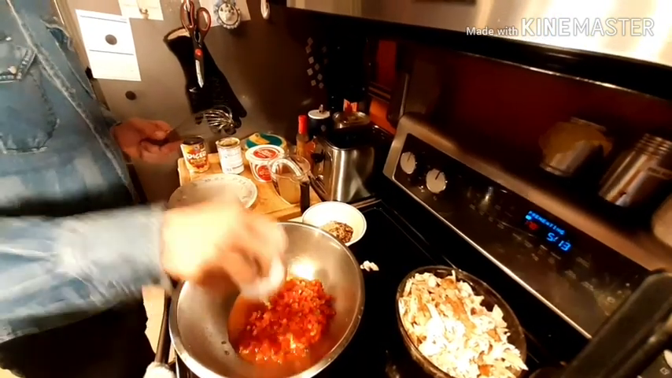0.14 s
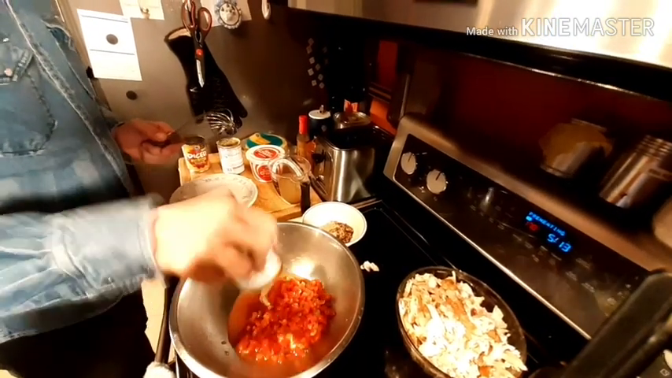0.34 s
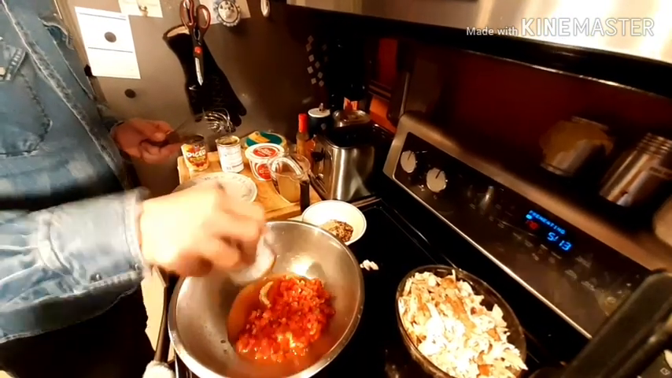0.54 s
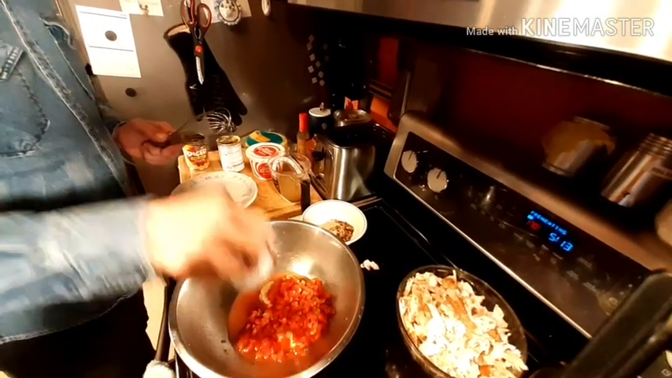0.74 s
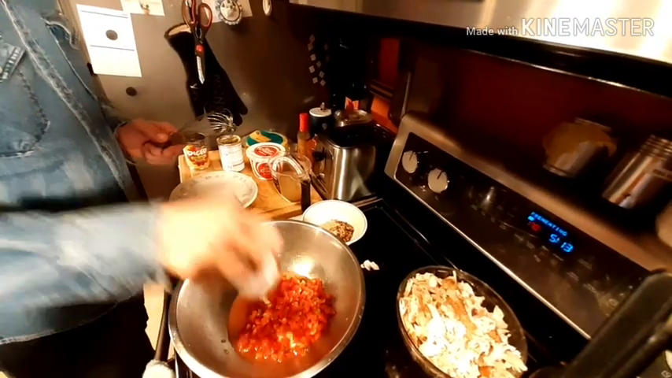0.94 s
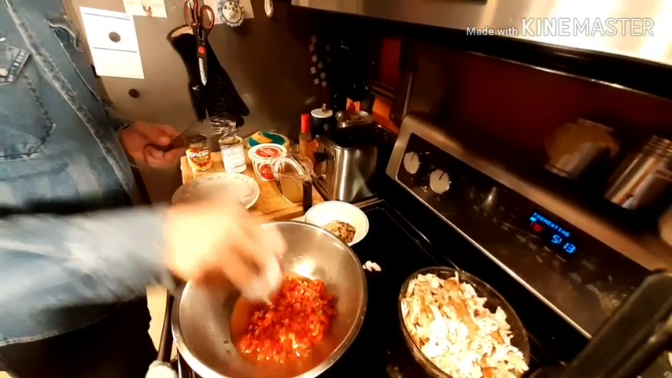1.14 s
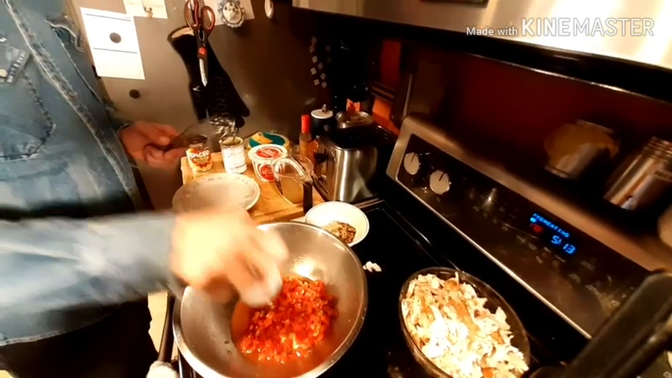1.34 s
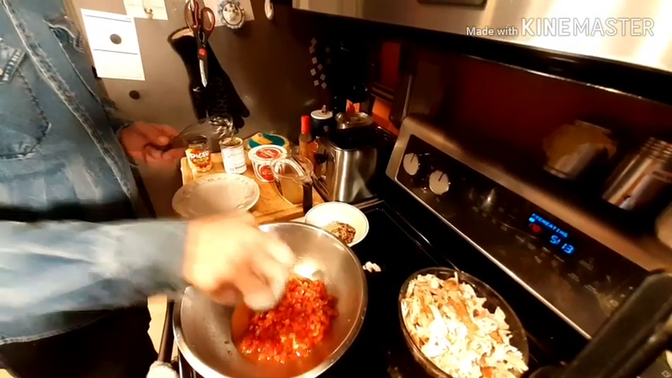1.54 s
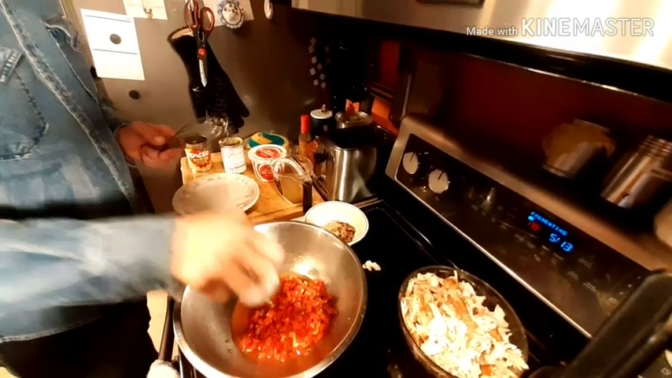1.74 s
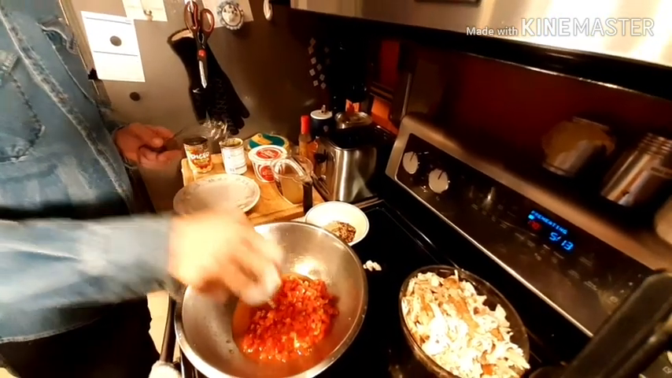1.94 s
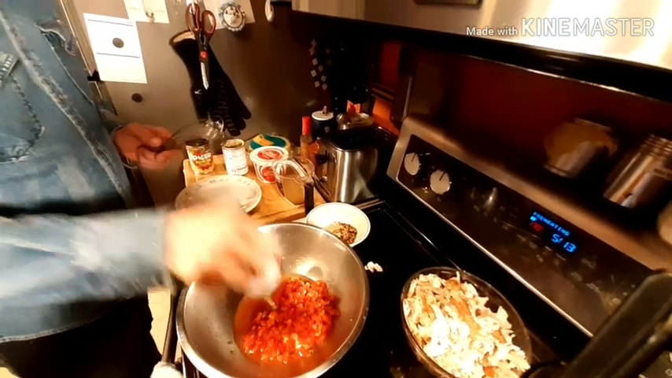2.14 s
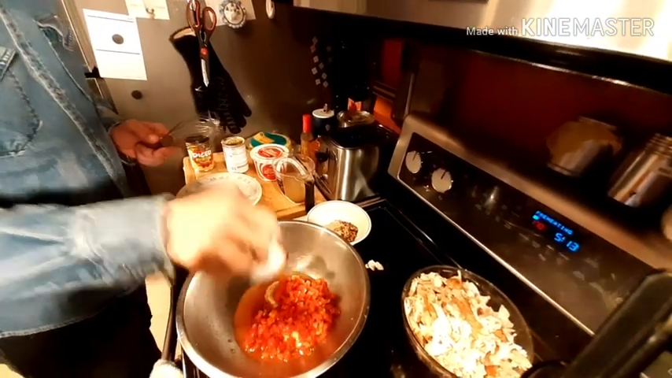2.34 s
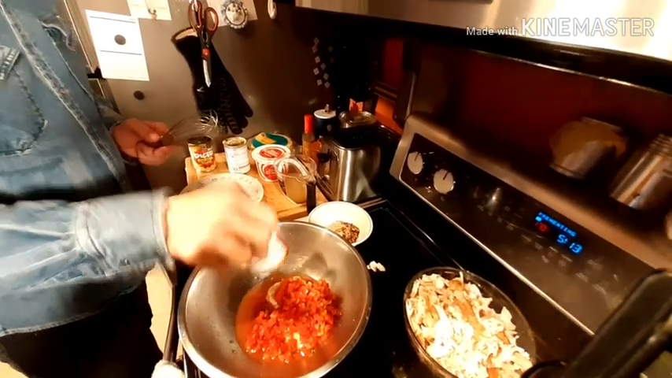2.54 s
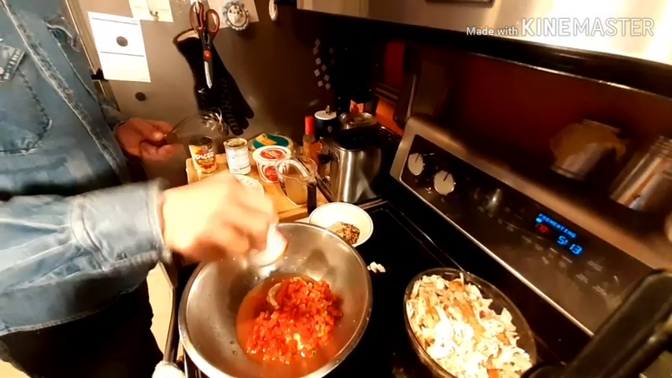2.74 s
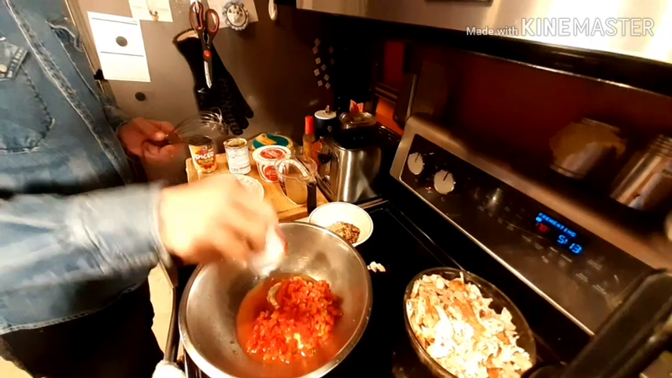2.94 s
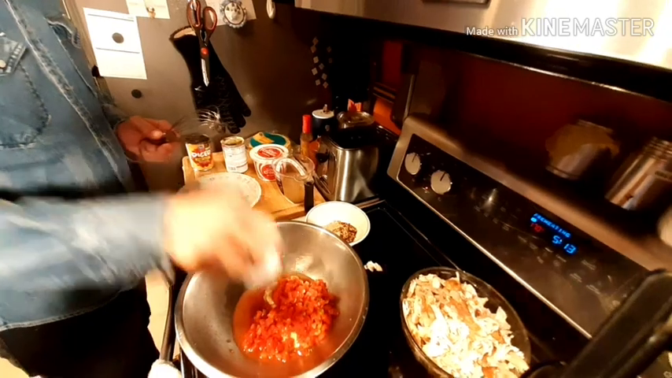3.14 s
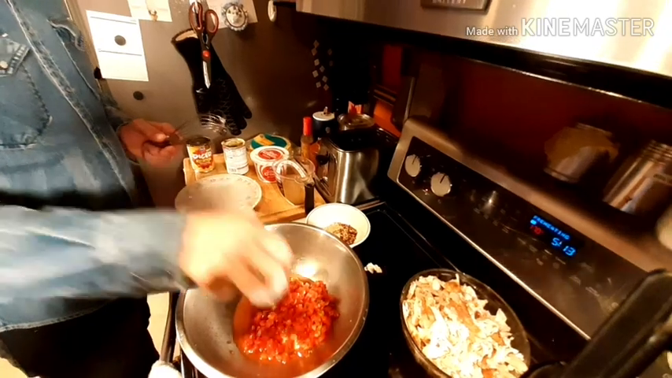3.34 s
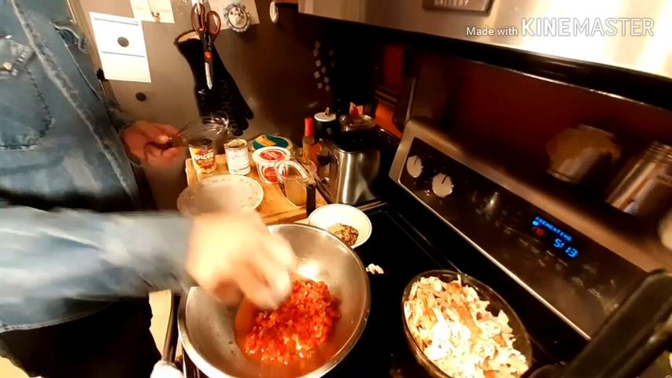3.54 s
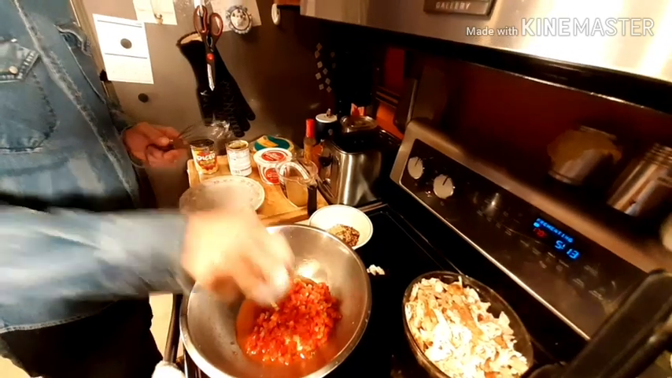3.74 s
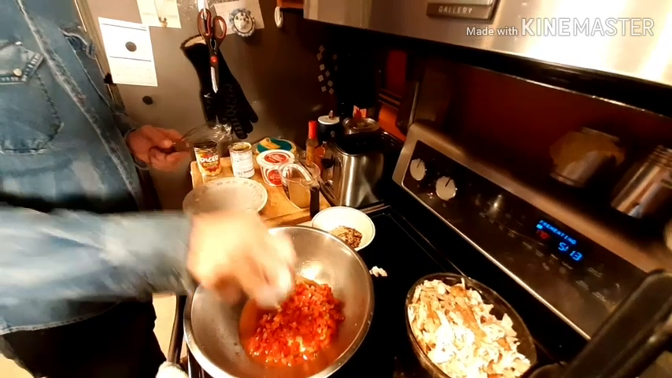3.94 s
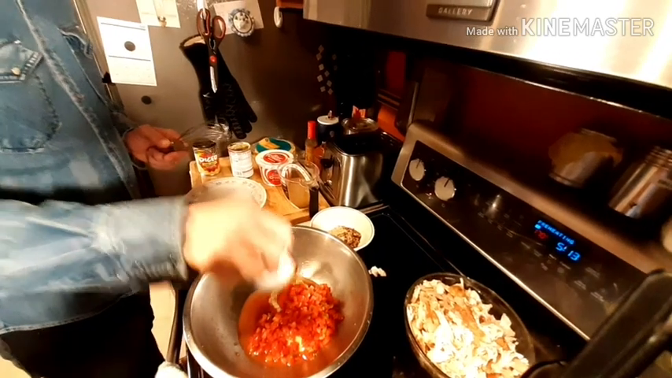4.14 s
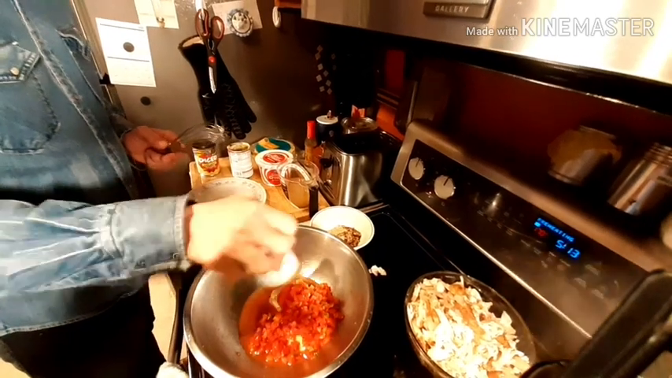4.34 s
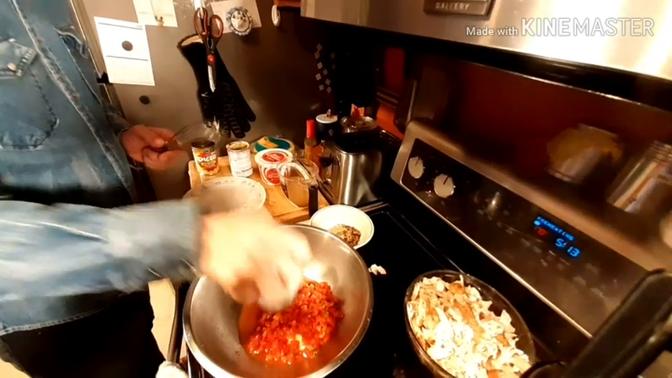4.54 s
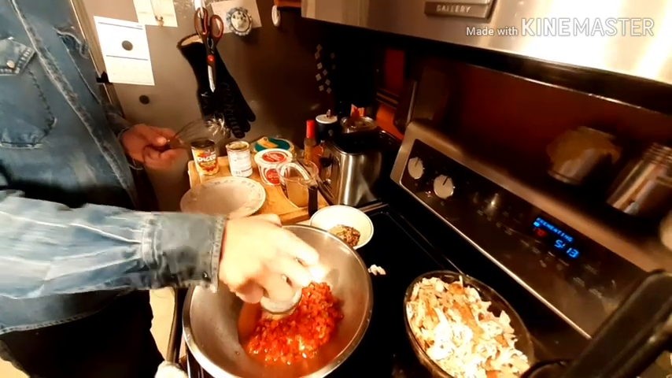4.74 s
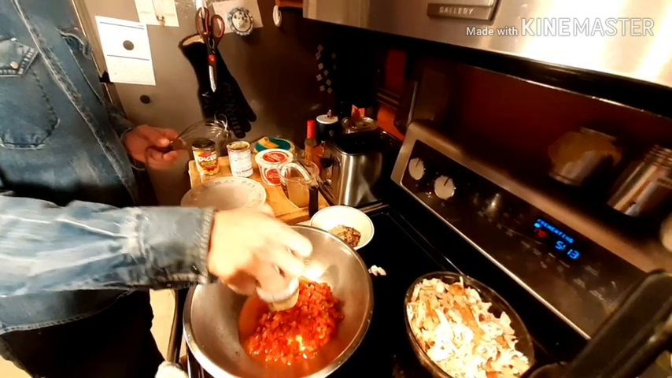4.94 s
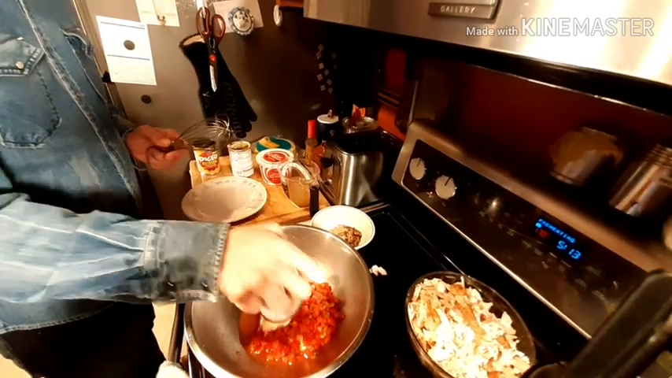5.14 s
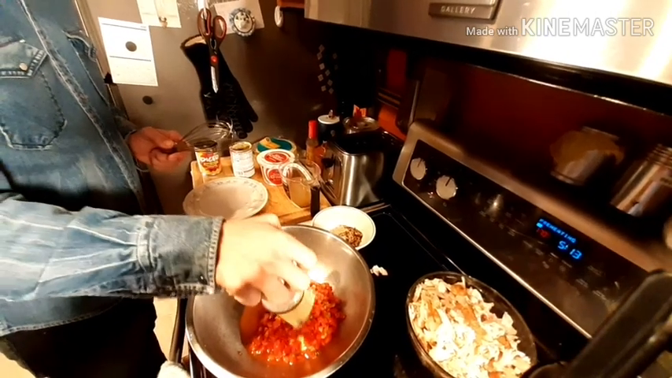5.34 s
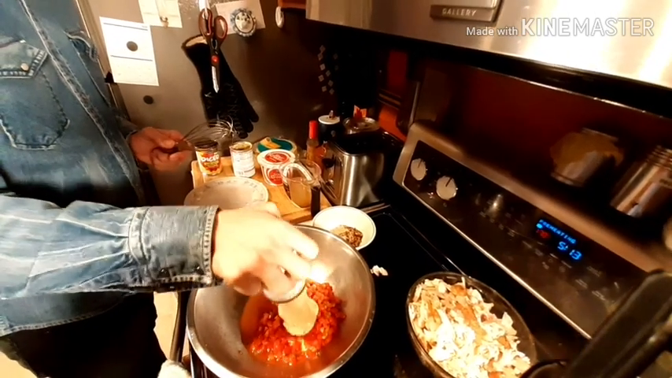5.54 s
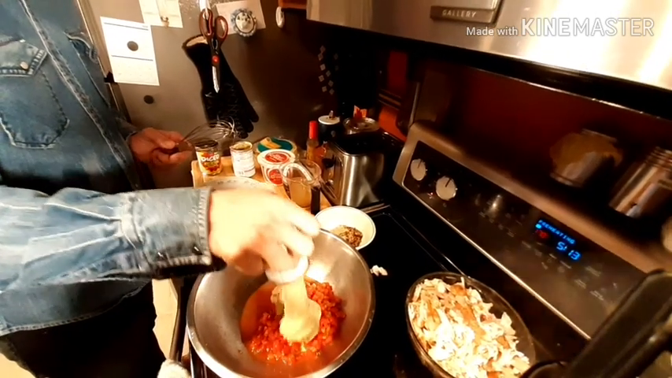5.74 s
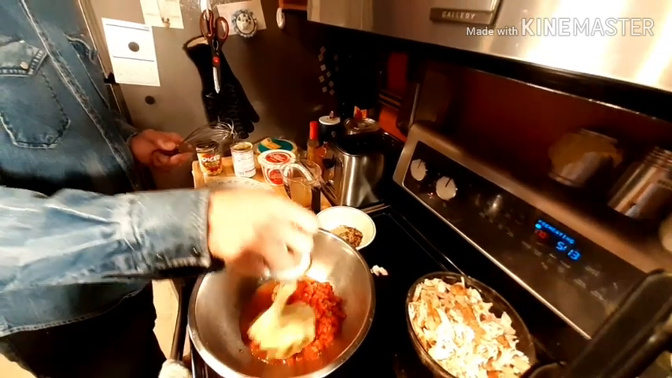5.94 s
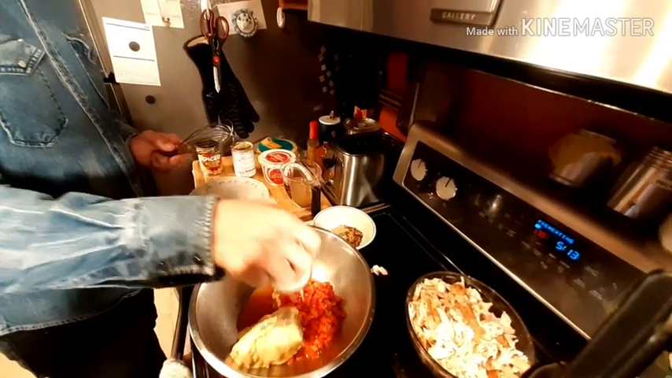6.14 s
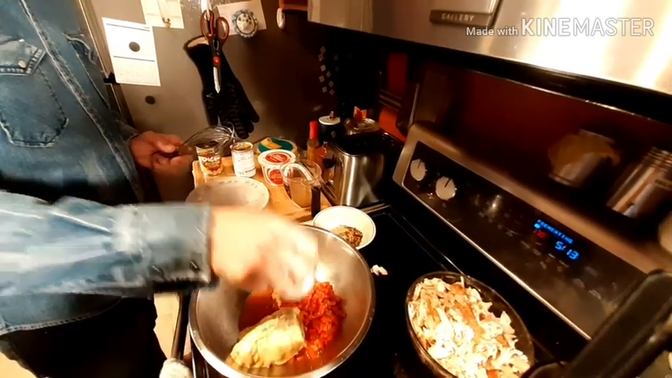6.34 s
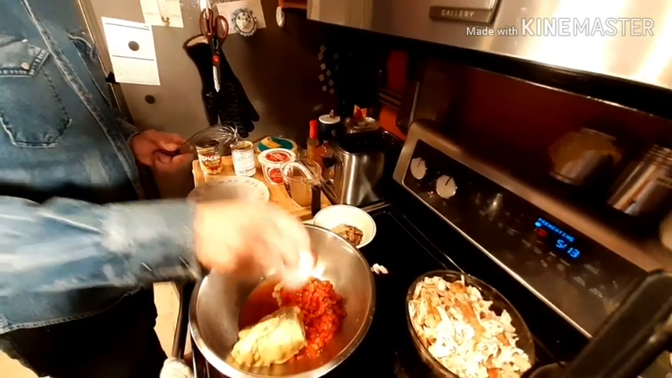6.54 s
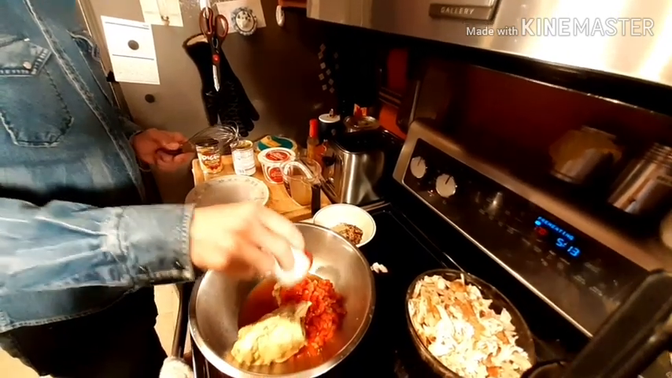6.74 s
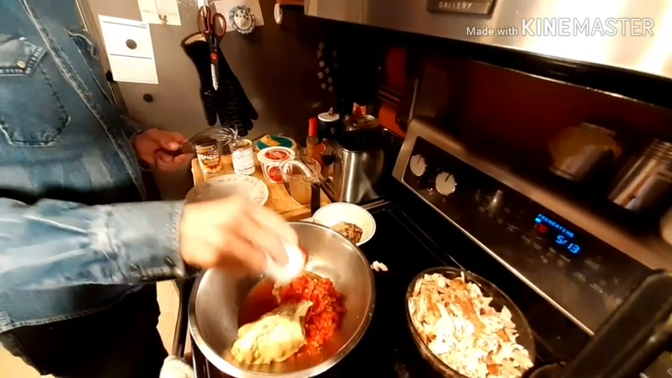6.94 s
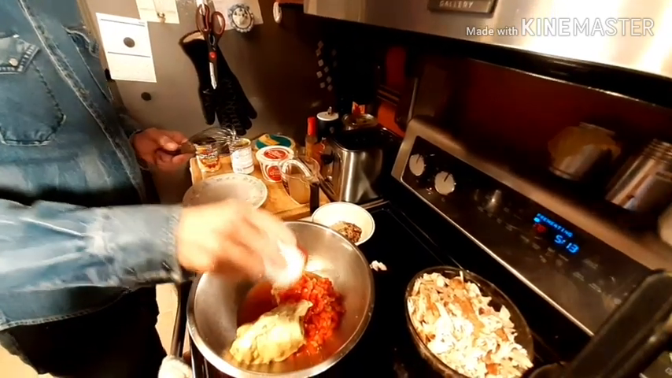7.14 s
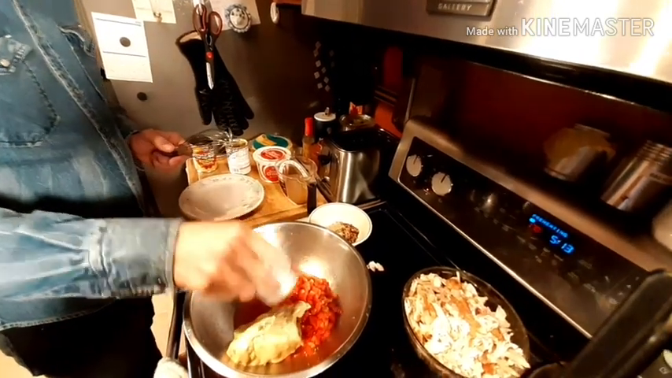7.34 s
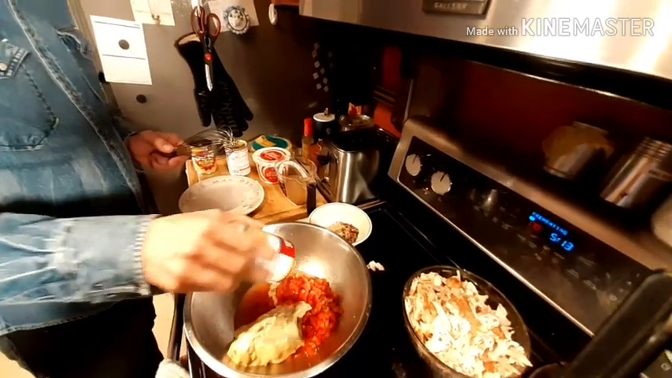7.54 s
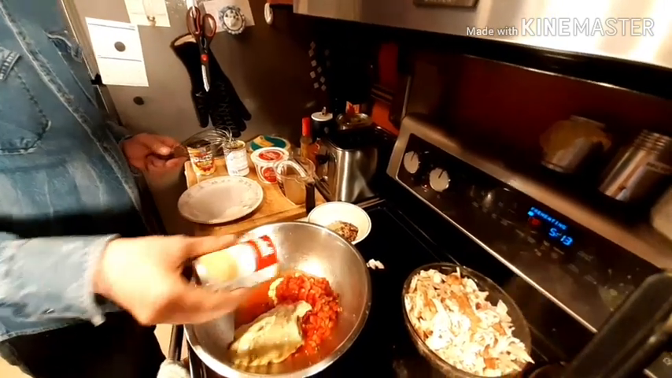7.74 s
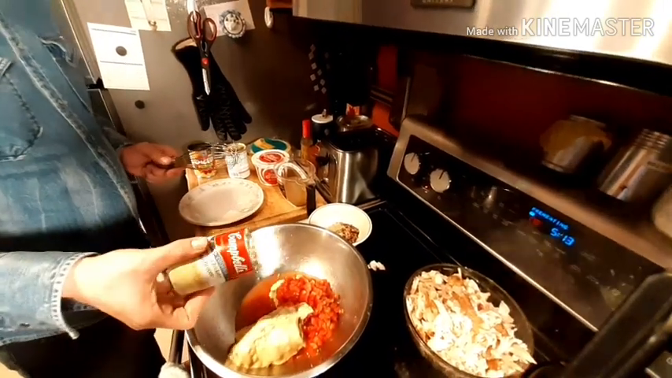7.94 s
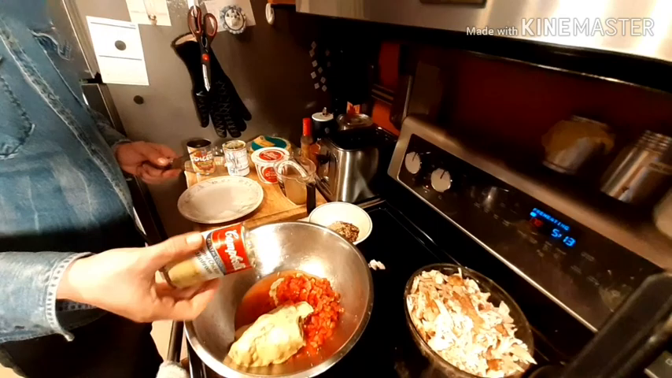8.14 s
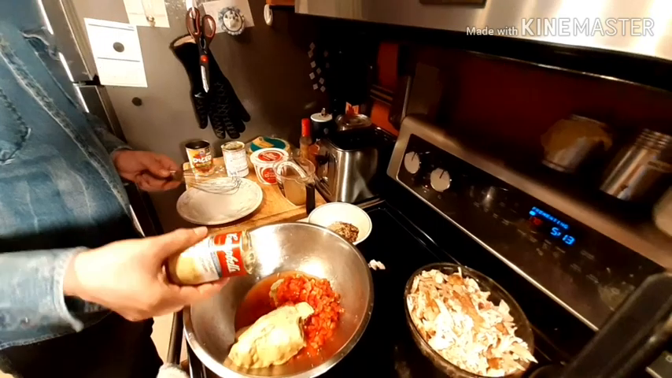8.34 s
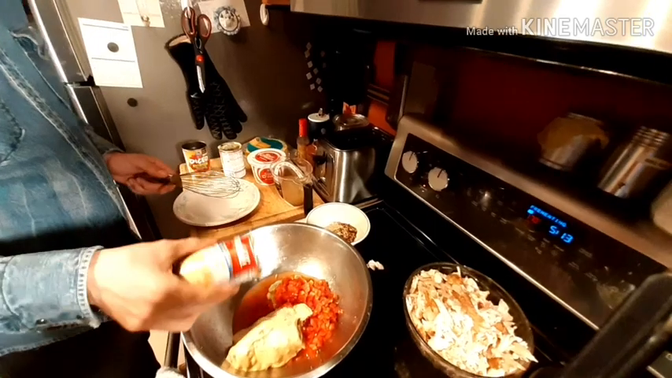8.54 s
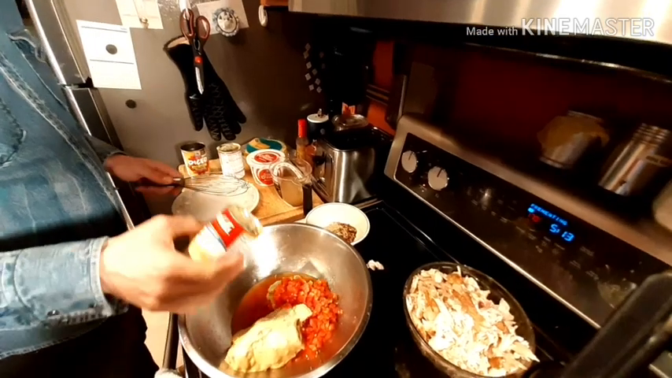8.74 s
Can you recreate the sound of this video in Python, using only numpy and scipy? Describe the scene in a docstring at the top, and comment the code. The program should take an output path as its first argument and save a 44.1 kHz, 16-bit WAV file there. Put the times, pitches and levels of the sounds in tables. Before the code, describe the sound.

Over steady hiss and motor hum, thick soup squelches and glugs in a shaken can, then plops heavily into a steel bowl.

```python
"""Steady hiss and a low motor hum come first; then wet squelches and glugs, as a can of thick soup is
shaken upside down over a steel bowl. The plug drops with a plop and a splat, and a last dollop follows.
Squelches are filtered bursts of clicks, glugs short sine tones, thuds pushes on ringing modes.
A sleeve's rustle, the hiss and the rumble are shaped noise; the hum, a sine tone, stops partway.
The can and bowl sounds also echo in a small kitchen."""
import sys
import numpy as np
from scipy import signal
from scipy.fft import rfft, irfft
from scipy.io import wavfile
from scipy.ndimage import uniform_filter1d

SR = 44100
rng = np.random.default_rng(int(sys.argv[2]) if len(sys.argv) > 2 else 0)


def wrap_up_sound(samples):
    """Save the sound to the file named by the first command line argument, as 16-bit audio."""
    columns = np.atleast_2d(samples).T
    # keep every value between -1 and 1, then stretch to whole-number steps
    tamed = np.clip(columns, -1, 1)
    steps = np.round(tamed * 32767).astype(np.int16)
    wavfile.write(sys.argv[1], SR, steps)


N = 390726  # samples in the whole scene

# Air crackling past the soup:
# start_s, length_s, cavity_pitch_hz, cavity_level_db, lip_level_db, spray_level_db
AIR_TEARS = [(0.9773, 0.0025, 2040, -23.5, -25, -25.5), (1.108, .0044, 1780, -30.5, -52, -44),
             (1.195, 0.0061, 2320, -18, -30.5, -24.5), (1.612, 0.0086, 1890, -31.5, -36, -39),
             (1.987, .015, 1900, -34.5, -37, -33), (2.173, .006, 1660, -39, -52, -45),
             (2.349, .0037, 1500, -41, -46, -34), (2.36, 0.0069, 1710, -37.5, -44, -40),
             (2.5542, .0043, 1700, -34, -41, -34), (2.654, .005, 1820, -39.5, -55, -48),
             (2.76, .0056, 1500, -42, -47, -42), (2.844, 0.0046, 2100, -34, -55, -47),
             (2.952, .008, 1890, -37, -42, -50), (2.9652, .006, 1700, -31.5, -31, -31),
             (3.18, .005, 1400, -35.5, -52, -38), (3.428, 0.0047, 1810, -30.5, -33, -29.5),
             (3.5875, 0.018, 1780, -37, -45, -35.5), (3.7914, .0083, 2030, -36.5, -42, -39.5),
             (3.987, .008, 2030, -42, -46, -38.5), (4.152, 0.0087, 1580, -47, -51, -33.5),
             (4.57, .0061, 2400, -40, -37.5, -34), (4.577, 0.0096, 2780, -28, -46, -34.5),
             (4.602, 0.0099, 1630, -32, -51, -39.5), (5.058, .008, 1780, -35, -57, -52),
             (5.111, 0.012, 2070, -40, -46, -35), (5.124, 0.015, 1200, -39, -49, -32.5),
             (6.0174, 0.008, 2180, -45, -49, -35)]
# Tone of the wet spray: pitch_hz, relative_level_db (per Hz)
SPRAY_TONE = [(1500, -12), (4000, -13), (4850, 4.5), (5800, 0), (7600, 3), (8300, 4), (9300, 1),
              (12000, 1.5), (15500, -6)]
CAVITY_WIDTH_HZ, USUAL_CAVITY_HZ = 1160, 1785
LIP_HZ, LIP_WIDTH_HZ = 3500, 1300  # the narrow lip of the gap
# The throat is set against the cavity level; the lower the cavity's pitch, the louder the throat.
THROAT_HZ, THROAT_WIDTH_HZ = 843, 690
THROAT_DB, THROAT_DB_PER_OCTAVE = -11, -29.5


def squelches():
    """Each tear rings the air in the can and the narrow lip of the gap, and throws a wet fizz."""
    out = np.zeros((2, N))
    for start_s, length, cavity_hz, cavity_db, lip_db, spray_db in list(AIR_TEARS) + faint_squelches():
        octaves = np.log2(cavity_hz / USUAL_CAVITY_HZ)
        throat_db = cavity_db + THROAT_DB + THROAT_DB_PER_OCTAVE * octaves
        direct, scattered = burst(length, fall=0.0031 + 0.42 * length, grain_db=5)
        drive = direct + 0.71 * scattered  # the steel wall scatters differently to each port
        parts = [
            (band(drive, THROAT_HZ, THROAT_WIDTH_HZ), throat_db),
            (band(drive, cavity_hz, CAVITY_WIDTH_HZ), cavity_db),
            (resonate(drive, LIP_HZ, LIP_WIDTH_HZ), lip_db),
            (colour(0.5 * direct + scattered, SPRAY_TONE), spray_db),
        ]
        add(out, start_s, sum(at_level(part, db, length + 0.0019) for part, db in parts))
    return out


FIRST_FAINT_S, LAST_FAINT_S, FAINT_LENGTH_S = 0.5, 4.5, 0.012
FAINT_DB, FAINT_SPREAD_DB = -46, 10  # loudest level, and how much weaker a part may be


def faint_squelches(count=8):
    """Small tears at random moments while the can is shaken, up to a quarter octave off the usual pitch."""
    rows = []
    for when, pitch, *weaker in rng.random((count, 5)):
        start_s = FIRST_FAINT_S + (LAST_FAINT_S - FIRST_FAINT_S) * when
        cavity_hz = USUAL_CAVITY_HZ * 2 ** (0.5 * (pitch - 0.5))
        part_levels = FAINT_DB - FAINT_SPREAD_DB * np.array(weaker)
        rows.append((start_s, FAINT_LENGTH_S, cavity_hz, *part_levels))
    return rows


# The steel wall's ringing notes: pitch_hz, relative_level_db, time_to_fall_60_db_s
STEEL_NOTES = [(1960, 0, 0.18), (2150, -19, .13), (2310, -3, 0.072), (2704, 3, 0.16), (3430, 0, .08),
               (8300, -12, .06)]


def steel_wall(tears):
    """The steel wall sings along with each tear."""
    return excite(tears, STEEL_NOTES, coupling_db=-54.5)


# Air pockets gulped into the can: start_s, pitch_hz, level_db
AIR_POCKETS = [(2.173, 615, -47), (2.555, 608, -42.5), (2.688, 300, -50), (2.76, 630, -40.5),
               (2.966, 644, -41), (3.100, 566, -31.5), (3.181, 346, -35), (3.398, 300, -39),
               (3.400, 547, -35.5), (4.258, 650, -46), (4.43, 620, -47), (4.5801, 328, -17.5),
               (4.594, 326, -31), (4.712, 545, -30), (5.058, 597, -34.5), (5.1093, 284, -35),
               (5.125, 323, -27), (5.135, 523, -33.5), (6.019, 175, -46)]
GLUG_LENGTH_S, GLUG_USUAL_HZ, GLUG_LENGTH_POWER = 0.0098, 400, 0.4  # low pockets throb for longer
GLUG_OVERTONE_DB = -19.5  # second harmonic against the first


def glugs():
    """A pocket of air throbs for a few cycles, until the soup closes on it."""
    out, t = np.zeros((2, N)), np.arange(SR // 20) / SR
    for start_s, hz, db in AIR_POCKETS:
        turn = 2 * np.pi * hz * t
        length = GLUG_LENGTH_S * (GLUG_USUAL_HZ / hz) ** GLUG_LENGTH_POWER
        closing = np.exp(-np.maximum(t - 0.816 * length, 0) / 0.001)
        gate = np.minimum(t / 0.0015, 1) * closing
        overtones = np.sin(2 * turn) + 0.52 * np.sin(3 * turn)
        tone = np.sin(turn) + amp(GLUG_OVERTONE_DB) * overtones
        add(out, start_s, amp(db) * (gate * tone)[None])
    return out


# The can's air column: pitch_hz, relative_level_db, time_to_fall_60_db_s
AIR_COLUMN_NOTES = [(355, -10, .12), (499.5, 3, 0.3), (525, 1, 0.24), (585, 2, .14)]


def air_column(gulps):
    """Each glug rings the column of air in the can."""
    return excite(gulps, AIR_COLUMN_NOTES, coupling_db=-55.5)


# Soft thuds of soup, and bumps of the handled can: start_s, level_db, push_length_s
SOFT_BLOWS = [(4.573, -30, 0.0025), (4.5809, -18, 0.0015), (4.601, -37, 0.0031), (4.711, -38.5, .00088),
              (5.11, -24, 0.0018), (5.127, -12, 0.0072), (5.1351, -20, 0.0064), (6.02, -32.5, 0.0051),
              (6.085, -41, .006), (6.895, -42, 0.0038), (6.924, -39.5, .004)]
# Hollow ring of the can and loaded bowl: pitch_hz, relative_level_db, time_to_fall_60_db_s
HOLLOW_NOTES = [(126, -6, .14), (170, -12, 0.044), (217, -2, 0.07), (259, -3.5, .11), (312, -4, 0.076),
                (357.6, -9, 0.23), (457, -27, .15), (487, -4, 0.27), (527, -5, 0.2), (740, -13, 0.22),
                (883, -16, 0.12), (1080, -11, 0.2)]
# Tone of the wet smack: pitch_hz, relative_level_db (per Hz)
SMACK_TONE = [(50, -32), (200, 1), (500, 1), (900, -6), (1400, -28), (2500, -16), (5000, -14)]
# Smack level against the thud, for the usual push; it grows with each doubling of the push length.
SMACK_DB, SMACK_DB_PER_DOUBLING, USUAL_PUSH_S = -22, 3, 0.003


def thuds():
    """A soft push rings the low modes; the longer the push, the duller. A wet smack comes with it."""
    out, t, body = np.zeros((2, N)), np.arange(SR // 2) / SR, ring(HOLLOW_NOTES)
    for start_s, db, length in SOFT_BLOWS:
        push = t * np.exp(-5 * t / length)
        thud = signal.fftconvolve(body, push / push.sum())[None, :len(t)]
        add(out, start_s, amp(db) * thud)
        smack_db = db + SMACK_DB + SMACK_DB_PER_DOUBLING * np.log2(length / USUAL_PUSH_S)
        direct, scattered = burst(0.008, fall=0.0078, grain_db=4)
        smack = colour(direct + 0.5 * scattered, SMACK_TONE)
        add(out, start_s, at_level(smack, smack_db, 0.012))
    return out


# The hand turning the can over: loudest_at_s, rise_s, fall_s, level_db
HAND_RUBS = [(6.90, 0.034, .25, -50.5), (7.67, 0.072, .1, -46), (7.73, 0.044, 0.11, -40.5)]
# Rustle of the shaking hand: time_s, level_db
SHAKING_RUSTLE = [(0, -68), (2.0, -68), (2.6, -55.5), (4.45, -56.5), (4.9, -74), (8.86, -78)]
# Tone of the sleeve: pitch_hz, relative_level_db (per Hz)
CLOTH_TONE = [(40, -35), (150, -15), (400, -3), (900, -2), (2200, 1), (4500, -5), (9000, -5), (15000, -9)]
RUB_EDGE_DB = -17.5  # change from a rub's top, one rise before it and one fall after it
HOLLOW_DB, BUMP_DB = -7, -23  # hollow can and dull bumping, against the sleeve


def handling():
    """Cloth brushes and fingers rub the can, which answers with its hollow note."""
    t, motion = np.arange(N) / SR, levels(SHAKING_RUSTLE)[0]
    for top_s, rise, fall, db in HAND_RUBS:
        distance = np.maximum((top_s - t) / rise, (t - top_s) / fall)
        motion = np.hypot(motion, amp(db + RUB_EDGE_DB * distance))
    unevenness = unit(uniform_filter1d(rng.standard_normal(N), 200))
    rub = rng.standard_normal((2, N)) * amp(2.1 * unevenness)
    sleeve = unit(colour(rub, CLOTH_TONE))
    hollow = amp(HOLLOW_DB) * unit(resonate(rub[0], 415, 157))
    bump = amp(BUMP_DB) * unit(resonate(rub[1], 170, 320))
    return motion * (sleeve + hollow + bump)


# Left-right balance of sound from the can: pitch_hz, left_minus_right_db
CAN_BALANCE = [(200, -2), (350, -1), (560, -4.5), (1000, -2), (2000, 0.5), (8000, 0.5)]


def ports(x, lag):
    """Sound from the can reaches the right port lag seconds later, and a little differently coloured."""
    hz = freqs(x)
    tilt = amp(read(CAN_BALANCE, hz) / 2)
    late = np.exp(-2j * np.pi * hz * lag)
    return irfft(rfft(x) * np.array([tilt, late / tilt]), N)


# How long the kitchen echoes: pitch_hz, time_to_fall_60_db_s
ECHO_TIMES = [(120, 0.24), (500, 0.33), (2500, 0.2), (6000, 0.28), (15000, 0.042)]


def kitchen(x, wet_db):
    """A dense tail of reflections, each band dying at its own speed."""
    taps = rng.standard_normal((2, SR // 2))
    hz, t, z = signal.stft(taps, SR, nperseg=256)
    same = 1 / (1 + (hz[:, None] / 800) ** 2)  # long waves reach both ports alike
    z[1] = same * z[0] + np.sqrt(1 - same ** 2) * z[1]
    tone_db = read([(150, -5), (500, 3), (2500, 0), (6000, 2), (15000, -0.5)], hz)
    fading = amp(-60 * t / read(ECHO_TIMES, hz)[:, None])
    onset = np.minimum(t / 0.0032, 1)
    tail = signal.istft(z * amp(tone_db)[:, None] * fading * onset, SR, nperseg=256)[1]
    return amp(wet_db) * signal.fftconvolve(x, tail / np.linalg.norm(tail[0]), axes=1)[:, :N]


# Appliance motor that switches off: time_s, hum_level_db, rumble_level_db
MOTOR_LEVELS = [(0, -59.5, -62), (1, -58, -63.5), (3.9, -58, -62.5), (4.05, -76, -62), (4.4, -74, -70),
                (8.86, -93, -81)]
# Tone of its rumble: pitch_hz, relative_level_db (per Hz)
RUMBLE_TONE = [(25, -36), (55, -0.5), (85, -4.5), (160, -1.5), (300, -11), (700, -24.5), (2000, -60)]


def motor():
    """A slightly wavering mains hum over a low rumble."""
    hum, rumble = levels(MOTOR_LEVELS)
    waver = unit(resonate(rng.standard_normal(N), 119.2, 12))
    tone = np.sqrt(2) * np.sin(2 * np.pi * 120 * np.arange(N) / SR) + 0.19 * waver
    low_noise = unit(colour(rng.standard_normal(N), RUMBLE_TONE))
    return (hum * tone + rumble * low_noise) * amp([[-1], [1]])  # a little stronger on the right


# Broad tone of the hiss: pitch_hz, relative_level_db (per Hz)
HISS_TONE = [(18, -56), (30, -47), (59, -6.5), (114, -2.5), (148, -11), (230, -11), (263, -16.5), (341, -8),
             (505, -9), (561, -8), (1170, -0.5), (2420, -2), (6890, -7), (12300, -5.5), (15500, -9.5)]
# Humps added to that tone: pitch_hz, width_hz, height_db
HISS_HUMPS = [(970, 62, 2.5), (2350, 410, 2.5), (7060, 600, 0), (8460, 660, 3)]
# Slow change in loudness: time_s, change_db
HISS_CHANGE = [(0, 0), (1.5, 0.5), (3.5, 1), (5.5, 0.5), (7, -0.2), (8.86, -0.5)]
# Likeness of the two microphone ports: pitch_hz, likeness_0_to_1
PORT_LIKENESS = [(100, 1.0), (500, 1), (900, .5), (1300, 0.38), (2200, 0.27), (3000, .17), (6000, 0.16),
                 (12000, 0)]
# How far the left port leads: pitch_hz, lead_radians
PORT_LEAD = [(400, 0), (1200, 0.32), (2000, -0.4), (3000, -0.77), (4800, -3), (7000, -1.5), (9000, -4)]
# Left-right balance of the hiss: pitch_hz, left_minus_right_db
PORT_BALANCE = [(60, -6), (110, -4.5), (200, -7.5), (380, -1.5), (700, -6.5), (1290, 0), (2380, -1),
                (4400, -0.5), (8120, -2.5), (15000, -2.0)]
# Echo off the nearest wall: delay_s, gain, fading_above_hz
WALL_ECHO = (.0059, 0.23, 3700)
HISS_DB = -45.5  # level of the two ports' average, before the slow change


def hiss():
    """Even background hiss: noise that is alike at both ports only in the bass."""
    a, b = rfft(rng.standard_normal((2, N)))
    hz = np.fft.rfftfreq(N, 1 / SR)
    same, lead = np.clip(read(PORT_LIKENESS, hz), 0, 1), read(PORT_LEAD, hz)
    right = (same * a + np.sqrt(1 - same ** 2) * b) * np.exp(-1j * lead)
    tilt = amp(read(PORT_BALANCE, hz) / 2)
    humps_db = sum(db * np.exp(-((hz - f) / width) ** 2) for f, width, db in HISS_HUMPS)
    shape = amp(read(HISS_TONE, hz) + humps_db)
    delay, gain, fade_hz = WALL_ECHO
    echo_gain = gain / (1 + (hz / fade_hz) ** 4)
    comb = abs(1 + echo_gain * np.exp(-2j * np.pi * hz * delay))
    mid_share = np.sqrt((1 + same * np.cos(lead)) / 2)  # what the two ports have in common
    pair = irfft(np.array([a * tilt, right / tilt]) * shape * comb / mid_share, N)
    return amp(HISS_DB) * levels(HISS_CHANGE)[0] * pair / pair.mean(0).std()


def burst(length, fall, grain_db, size=4096):
    """A film tears: a short run of uneven micro-clicks that holds and then dies."""
    t = np.arange(size) / SR
    gate = np.minimum(t / 0.00051, 1) * np.exp(-np.maximum(t - 0.87 * length, 0) / fall)
    grain = amp(grain_db * rng.standard_normal(size))
    clicks = rng.standard_normal((3, size)) * grain * gate
    return clicks[0], clicks[1:]  # one direct sound, and a scattered one for each port


def ring(modes):
    """The response of a set of modes to a tap; small things radiate no deep bass."""
    t = np.arange(SR // 2) / SR
    tones = sum(amp(db - 60 * t / t60) * np.cos(2 * np.pi * hz * t) for hz, db, t60 in modes)
    return signal.sosfilt(signal.butter(2, 70, "high", fs=SR, output="sos"), tones)


def excite(x, modes, coupling_db):
    """Sound in the air sets nearby modes ringing."""
    return amp(coupling_db) * signal.fftconvolve(x, ring(modes)[None], axes=1)[:, :N]


def band(x, hz, width_hz):
    """A broad, flat-topped resonance of a damped air space, centred on hz in octaves."""
    low = np.hypot(hz, width_hz / 2) - width_hz / 2
    return signal.sosfilt(signal.butter(3, [low, low + width_hz], "band", fs=SR, output="sos"), x)


def resonate(x, hz, width_hz):
    """A resonance passed twice, for steep skirts."""
    b, a = signal.iirpeak(hz, hz / width_hz, SR)
    return signal.lfilter(b, a, signal.lfilter(b, a, x))


def colour(x, spectrum):
    """Filters by a table of pitch_hz, level_db."""
    return irfft(rfft(x) * amp(read(spectrum, freqs(x))), x.shape[-1])


def freqs(x):
    """The frequencies in Hz of the bins of x."""
    return np.fft.rfftfreq(x.shape[-1], 1 / SR)


def read(points, hz):
    """Reads a table along log frequency."""
    f, value = np.transpose(points)
    return np.interp(np.log(hz + 1), np.log(f + 1), value)


def levels(rows):
    """The dB columns of a time table as gains, sample by sample."""
    s, *columns = np.transpose(rows)
    return [amp(np.interp(np.arange(N) / SR, s, c)) for c in columns]


def amp(db):
    """Decibels to gain."""
    return 10 ** (np.asarray(db) / 20)


def unit(x):
    """Scales to an rms (average strength) of 1."""
    return x / np.sqrt(np.mean(x ** 2) + 1e-20)


def at_level(x, db, length):
    """Gives a burst the energy of that level held for that length in seconds."""
    return amp(db) * unit(x) * np.sqrt(length * SR / x.shape[-1])


def add(mix, s, sound):
    """Mixes a sound into the stereo mix at time s."""
    part = mix[:, max(round(s * SR), 0):][:, :sound.shape[1]]
    part += sound[:, :part.shape[1]]


def scene():
    """Soup, bowl and hand in the kitchen, over hiss and hum."""
    tears, gulps = squelches(), glugs()
    bright = ports(tears + steel_wall(tears), lag=0.00023)
    deep = ports(gulps + air_column(gulps) + thuds(), lag=0.0001)
    room = kitchen(bright, wet_db=-8.5) + kitchen(deep, wet_db=-12.0)
    return bright + deep + room + handling() + hiss() + motor()


def record(dry):
    """The recorder's band limit: little passes above 15650 Hz."""
    low_pass = signal.firwin(511, 15650, window=("kaiser", 9), fs=SR)
    return signal.oaconvolve(dry, low_pass[None], "same")


dry = scene()
out = record(dry)
wrap_up_sound(out)
```